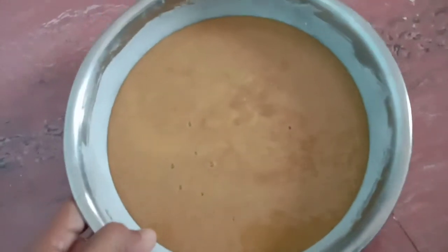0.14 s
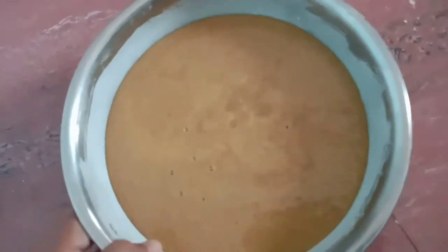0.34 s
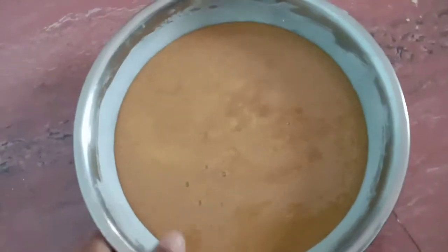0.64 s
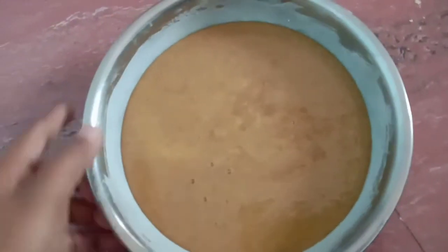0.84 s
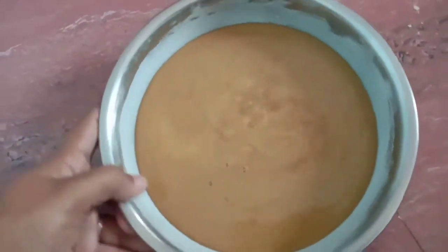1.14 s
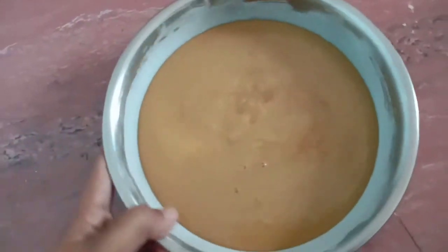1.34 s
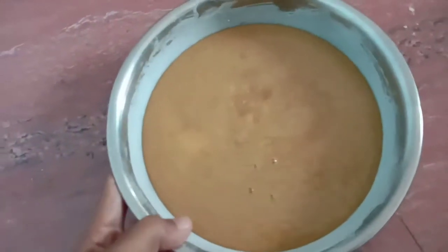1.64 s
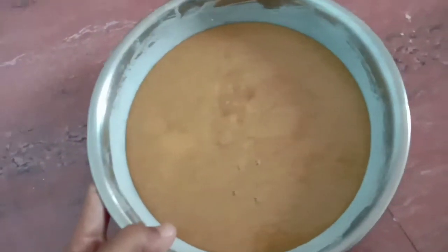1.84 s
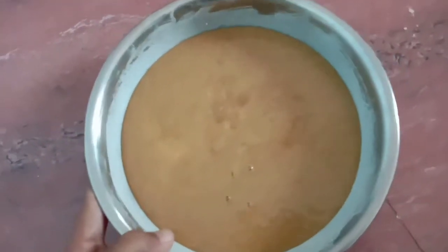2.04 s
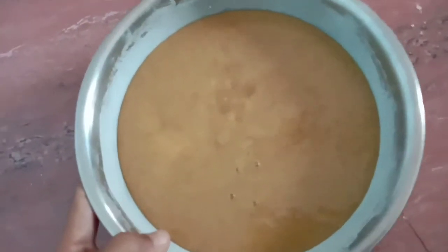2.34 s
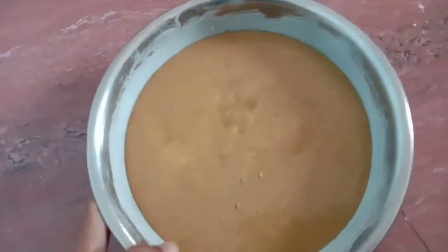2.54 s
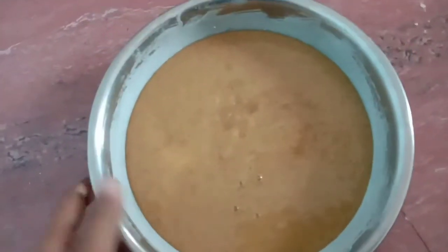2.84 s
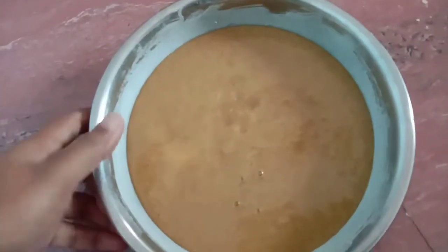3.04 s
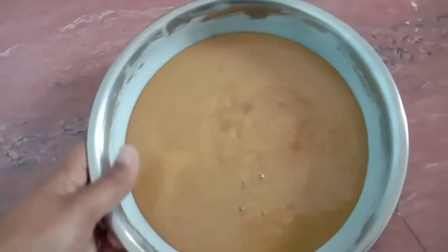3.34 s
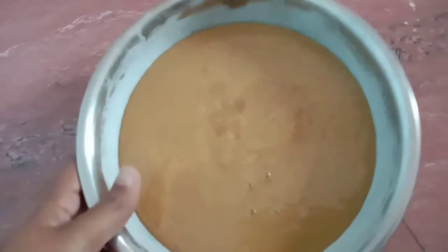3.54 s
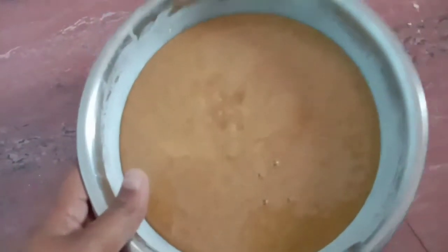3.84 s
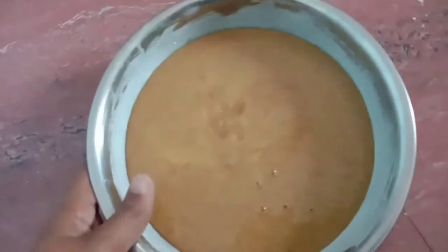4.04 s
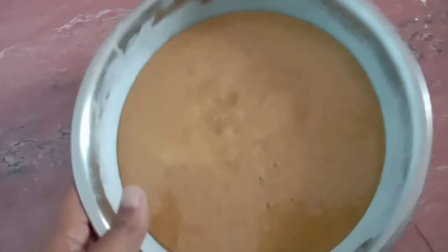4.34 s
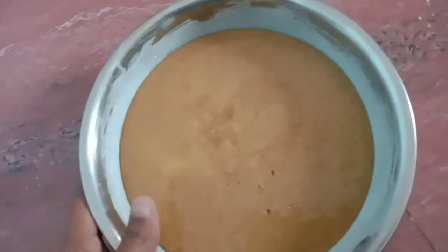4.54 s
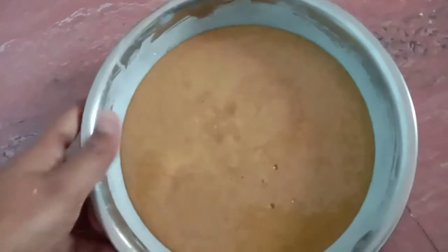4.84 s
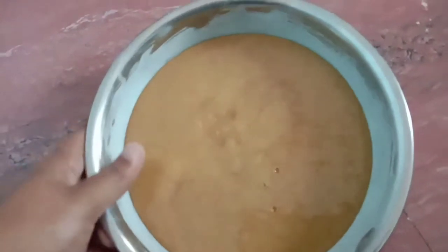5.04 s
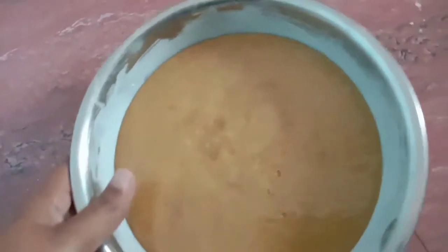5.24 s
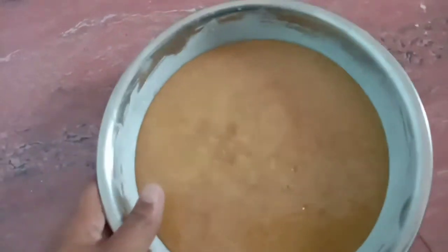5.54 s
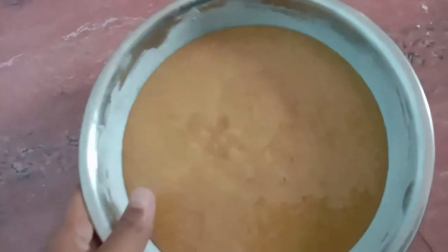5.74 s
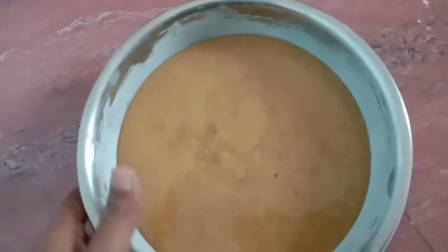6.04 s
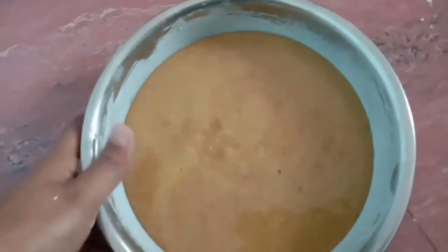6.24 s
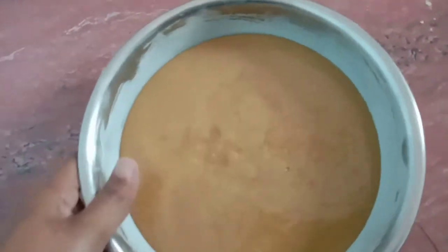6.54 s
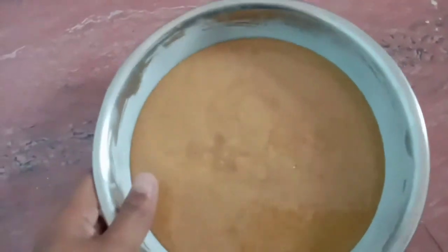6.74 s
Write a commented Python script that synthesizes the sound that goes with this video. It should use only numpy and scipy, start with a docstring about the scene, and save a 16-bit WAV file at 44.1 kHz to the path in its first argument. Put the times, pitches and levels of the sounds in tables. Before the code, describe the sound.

A steel tin heavy with batter is knocked on a hard floor, very close to a phone microphone in a bare, reflective room. The tail of an earlier knock opens the scene; a strong thump with an instant rebound lands at 0.3 s, with a weak clink at 0.4. Fingers tick lightly on the rim and the tin shifts faintly around 1.0-1.3. Firm knocks follow at 1.9 and 2.5, then small ticks at 2.7. Another pair comes at 3.9 and 4.4, the second clattering into a rebound, and another at 5.4 and 5.8, with quick double contacts. A softer knock at 6.6 ends it, its echo cut off. Each blow is abrupt, dull and hollow, with a few milliseconds of steel, a faint rim ring and a roomy tail fading within half a second. Underneath lie faint hum, a wavering thin whine and low rumble with brief swells.

```python
"""A steel tin full of batter is knocked on a hard floor in loose pairs, close under a phone microphone.
Each contact sums a short thump, short low tones, steel sines, filtered-noise grit and a faint rim ring;
delayed copies are floor, wall and ceiling echoes, and convolution with random taps is the bare room.
Fingers tick on the rim (sine clusters and noise) and now and then shift the tin (resonated grit).
Beneath lie a faint household hum, a thin whine and a low rumble, all shaped noise."""
import sys
import numpy as np
from scipy import signal
from scipy.fft import rfft, irfft
from scipy.io import wavfile
from scipy.ndimage import uniform_filter1d, minimum_filter1d

SR = 44100
rng = np.random.default_rng(int(sys.argv[2]) if len(sys.argv) > 2 else 0)


def field_ratio(decibels):
    """Amplitude ratio for a level in dB (20 dB per decade); scalars and array-likes work."""
    return 10 ** (np.asarray(decibels, dtype=float) / 20)


def generate_wav(sig):
    """Save sig (samples, or channels by samples) to the path in sys.argv[1] as 16-bit PCM at SR."""
    pcm = np.round(np.clip(np.atleast_2d(sig).T, -1, 1) * 32767).astype(np.int16)
    wavfile.write(sys.argv[1], SR, pcm)


N = 303652

# Contacts of tin and floor, rebounds too; steel, crack and room are relative to the blow:
# (time [s], blow [dB], steel ring [dB], crack [dB], room [dB])
KNOCKS = [(-0.0949, -8, -9, -34, -11), (0.3333, 2.5, -5.5, -19.5, -11), (0.3395, 0.5, -13, -15, -10.5),
          (.4108, -18.5, -1.5, -0.5, -13.5), (0.4254, -13, -9.5, -25, -5.5), (1.9397, 0, -7, -24, -8.5),
          (2.5065, 1.5, -7.5, -15.5, -8), (2.529, -11.5, -4.5, -18, -11), (3.8551, 2.5, -2, -22, -6.5),
          (4.387, 0, 1.5, -17.5, -6), (4.3959, -6.5, -16, -5.5, -9.5), (4.475, 0, -8, -20, -8),
          (5.433, 3.5, -13.5, -21, -12.5), (5.4394, -2.5, -5.5, -15.5, -7), (5.84, 2.5, -6, -21.5, -6.5),
          (5.843, -1, 3, -14, -7), (5.8962, -8.5, -16, -21, -1.5), (6.6445, -5.5, -10, -35, -7.5),
          (6.6533, -20, -1.5, -18.5, 0.5)]
# Short low tones of the knock, coloured by the near echo: (frequency [Hz], level [dB], t60 [s])
LOW_TONES = [(150.8, -43, 0.089), (325.5, -26, 0.03), (507, -8.5, 0.026), (773, -21.5, 0.025),
             (1216, -9.5, 0.015), (1682, -19, 0.046)]
# Steel wall of the tin: (frequency [Hz], level [dB], t60 [s])
STEEL_MODES = [(2646, -46, 0.038), (3430, 3.5, 0.0044), (3620, -23, 0.023)]
# Bare rim above the batter: (frequency [Hz], level [dB], t60 [s])
RIM_MODES = [(1694, -48.5, 0.22), (2260, -40.5, 0.374), (2580, -41.5, 0.34), (2730, -48, 0.13),
             (3304, -48, 0.202), (3420, -46.5, 0.24), (3800, -43, .25), (6100, -48.5, 0.13),
             (7300, -45, 0.19)]
# First reflections: (delay [ms], thump and low tones [dB], steel and grit [dB])
ECHOES = [(2.53, -8, -7), (15.84, -14, -33.5), (24.86, -20.5, -18)]
# Room decay before steepening: (frequency [Hz], t60 [s])
ROOM_T60 = [(100, 0.94), (260, 0.84), (450, 0.78), (950, 0.73), (1280, 0.77), (1840, 0.63), (4850, 0.56),
            (12800, 0.28)]
# Room tail colour: (frequency [Hz], gain [dB])
ROOM_COLOUR = [(60, -0.5), (150, 7.5), (300, -0.5), (450, 1), (620, -3), (1020, -3.5), (1270, 2.5),
               (1520, 3.5), (1800, 4), (2500, 11), (3500, -5), (4700, 5.5), (6000, 19.5), (7300, 13.5),
               (10000, 7.5), (15500, 6.5)]
# Tones that linger in the tail, before steepening: (frequency [Hz], level [dB], t60 [s])
TAIL_TONES = [(158.9, -34.5, 0.94), (224.8, -34.5, 0.66), (293, -35.5, 1), (356, -32.5, 0.55),
              (412, -36, 0.74), (480.6, -41, 0.84), (593, -39.5, 0.81), (767, -46, 0.37), (800, -37, 0.35),
              (716, -36, .45), (887, -43, .43), (1050, -42.5, 0.38), (1242, -37.5, 0.707),
              (1308, -46, 0.77)]
# Hum spectrum, relative: (frequency [Hz], density [dB per Hz])
HUM_SPECTRUM = [(32, -32), (55, 1), (145, -1), (1010, -17), (1250, -15), (1400, -19.5), (1780, -20),
                (2310, -17.5), (2790, -15.5), (4160, -25), (6530, -29.5), (7170, -23.5), (8870, -38),
                (13300, -42.5), (15300, -34.5), (15900, -70)]
# Fuzzy tones in the hum: (frequency [Hz], width [Hz], level [dB], wavering [dB])
HUM_TONES = [(1245, 72, -71.5, 3), (3060, 50, -89, 2.5), (3587, 230, -81.5, -3), (5880, 210, -79.5, -1),
             (7370, 170, -81, 0), (15200, 300, -93, -2.5)]
# Thin whine: (time [s], level [dB])
WHINE_LEVEL = [(0, -66), (.7, -71.5), (1.3, -84), (2.35, -70.5), (3.6, -68.5), (4.4, -76), (5.3, -72.5),
               (6.6, -65.5), (6.9, -81)]
# Brief swells of the rumble: (time [s], rise [dB], width [s])
RUMBLE_SWELLS = [(.75, 13.5, 0.068), (3.75, 15, 0.026), (6.3, 17, 0.13), (6.548, 0, 0.033)]
# Fingers on the rim: (time [s], level [dB], frequency [Hz])
TICKS = [(0.5732, -51, 7500), (0.6225, -43.5, 8520), (0.9233, -60, 8600), (0.945, -63, 8300),
         (0.9846, -55, 8660), (1.059, -47.5, 8100), (1.2166, -52.5, 7950), (1.266, -38.5, 9370),
         (1.493, -55, 8040), (1.545, -65.5, 7300), (2.702, -42, 8800), (2.7295, -41.5, 7240),
         (2.753, -59, 6900), (2.804, -66, 7200), (3.3518, -60, 8280), (4.582, -39.5, 8630),
         (4.887, -45, 8240), (6.3458, -61.5, 7210)]
# The hand shifts the tin; treble and low tones are relative to the middle band:
# (time [s], middle level [dB], hold [s], treble [dB], low tones [dB])
SHIFTS = [(1.068, -52.5, 0.021, -0.5, 2.5), (1.246, -53.5, .065, -10, -8.5), (2.714, -48, 0.0094, -26, -32),
          (4.866, -67, 0.0089, -5, -15.5)]
# Rubbed tin's tones, relative within each band: (frequency [Hz], width [Hz], level [dB])
RUB_TONES = [(756, 230, 5), (1750, 110, -4), (2850, 24, 4), (3580, 200, 9), (5920, 130, 32), (6880, 41, 15),
             (7500, 38, 37), (7800, 80, -46), (10500, 80, -28)]
# Microphone response: (frequency [Hz], gain [dB])
MIC_RESPONSE = [(25, -38), (60, -13), (110, 2.5), (200, 0), (3900, -3), (4600, -8), (5600, 0.5), (8000, 1),
                (10000, -8), (13000, -19), (15300, -1), (15800, -22), (17000, -59.5)]
# Left-right difference hiss, relative: (frequency [Hz], density [dB per Hz])
SIDE_SPECTRUM = [(15, -31), (25, -8.5), (124, 1.5), (1090, -7), (1250, 2.5), (1640, -11), (5880, -7),
                 (7300, -28), (9330, -18.5), (14800, -10.5), (15400, -11.5), (15900, -51)]

LANDING_MS, REBOUND_MS = 0.27, 0.33  # thump half-width: the edge lands hard, rebounds are softer
REBOUND_WITHIN_S = 0.2
THUMP_PEAK_S, RING_START_S = 0.0015, 0.0011  # from the start of a knock's sound
ROOM_START_MS, ROOM_BUILD_MS, ROOM_STEEPEN_DB_PER_S2 = 7.9, 5.1, 108
ROOM_PATCHY_DB = 2.5  # some tones linger where others drop out
HUM_DB, SIDE_DB = -63, -79
WHINE_HZ, WHINE_WIDTH_HZ, WHINE_WAVER_DB = 2778, 32, 3
RUMBLE_HZ, RUMBLE_WIDTH_HZ, RUMBLE_DB, RUMBLE_WAVER_DB = 149, 39, -70, 4.5
TICK_RIM_DB, TICK_SNAP_DB = 20, -8
SHIFT_RISE_S, SHIFT_FALL_DB_PER_S = 0.012, 192
CEILING_DB, AHEAD_MS, RECOVER_DB_PER_S = -3, 8.1, 99


def evened(x):
    """Scales to rms 1."""
    return x / np.sqrt(np.mean(x ** 2) + 1e-20)


def read(points, hz):
    """Interpolates points linearly on a log-frequency axis."""
    f, value = np.transpose(points)
    return np.interp(np.log(hz + 1), np.log(f + 1), value)


def add(mix, time_s, sound):
    """Mixes a sound in at a time that may lie before the start."""
    at = round(time_s * SR)
    sound = sound[max(-at, 0):]
    part = mix[max(at, 0):][:len(sound)]
    part += sound[:len(part)]


def resonate(x, hz, width_hz):
    """One-pole resonance of gain 1: shifted to 0 Hz, smoothed, shifted back."""
    turn = np.exp(2j * np.pi * hz * np.arange(len(x)) / SR)
    r = np.exp(-np.pi * width_hz / SR)
    return 2 * (turn * signal.lfilter([1 - r], [1, -r], x / turn)).real


def rings(modes, t, spread_db=0, detune=0):
    """Sum of decaying sines; each call stirs their levels and pitches afresh."""
    out = 0
    for hz, db, t60_s in modes:
        level_luck, pitch_luck = rng.standard_normal(2)
        envelope = field_ratio(db + spread_db * level_luck - 60 * t / t60_s)
        out = out + envelope * np.sin(2 * np.pi * hz * (1 + detune * pitch_luck) * t)
    return out


def slow(rate_per_s, count):
    """Slow random curve of rms 1."""
    points = rng.standard_normal(int(count / SR * 2 * rate_per_s) + 2)
    return evened(signal.resample(points, count))


def room(sound):
    """Room tail: evenly dense random taps swell up, and each band dies at its own speed, ever faster."""
    t = np.arange(SR) / SR
    slots = np.arange(0, SR - 16, 16)
    at = slots + rng.integers(0, 16, len(slots))
    clumps = field_ratio(1.2 * slow(90, SR))  # big surfaces answer in bunches
    taps = np.zeros(SR)
    taps[at] = rng.standard_normal(len(at)) * clumps[at]

    hz, frame_s, z = signal.stft(taps, SR, nperseg=512)
    t60_s = np.clip(read(ROOM_T60, hz), 0.1, 2)[:, None]
    fade_db = read(ROOM_COLOUR, hz)[:, None] - 60 * frame_s / t60_s
    patches = uniform_filter1d(rng.standard_normal(z.shape), size=2, axis=0)
    patches = evened(uniform_filter1d(patches, size=24, axis=1))
    tail = signal.istft(z * field_ratio(fade_db + ROOM_PATCHY_DB * patches), SR, nperseg=512)[1][:SR]

    for _ in range(2):  # close pairs beat
        tail += rings(TAIL_TONES, t, spread_db=4, detune=0.015)
    late_ms = np.maximum(t * 1000 - ROOM_START_MS, 0)
    build = 1 - np.exp(-late_ms / ROOM_BUILD_MS)
    steepen = field_ratio(-ROOM_STEEPEN_DB_PER_S2 * (late_ms / 1000) ** 2)
    return signal.fftconvolve(sound, tail * build * steepen / np.sqrt(150))


def knock(blow_db, steel_db, crack_db, room_db, half_width_ms):
    """The tin stops dead: a suck-push-suck of air, short low tones, steel ring and gritty crack."""
    t = np.arange(16000) / SR
    u = (t - THUMP_PEAK_S) * 1000 / half_width_ms
    thump = (1 - u ** 2) * np.exp(-u ** 2 / 2)
    after = np.maximum(t - RING_START_S, 0)
    swell = 1 - np.exp(-(after / 0.00021) ** 2)  # the floor's push builds up over the contact
    grit = resonate(rng.standard_normal(len(t)), 7500, 5050) * np.exp(-after / 0.0022)

    low = thump + swell * rings(LOW_TONES, after, spread_db=2)
    steel = swell * field_ratio(steel_db) * rings(STEEL_MODES, after, spread_db=1)
    high = steel + swell * field_ratio(crack_db) * grit
    # the room is fed one even click in place of the grit
    click = field_ratio(crack_db + 16) * signal.unit_impulse(len(t), idx=66)

    out = field_ratio(room_db) * room(low + field_ratio(3.5) * steel + click)
    add(out, 0, swell * rings(RIM_MODES, after, spread_db=4, detune=0.01))
    direct = (0, 0.0004, 0.0036)
    for delay_ms, low_db, high_db in [direct] + list(ECHOES):
        add(out, delay_ms / 1000, field_ratio(low_db) * low + field_ratio(high_db) * high)
    return field_ratio(blow_db) * out


def hum():
    """Patchy broadband noise, as it leaves the microphone, with fuzzy tones that come and go."""
    frames, hz = N // 256 + 5, np.fft.rfftfreq(1024, 1 / SR)
    real, imag, patches = rng.standard_normal((frames, 513, 3)).T
    patches = uniform_filter1d(patches, 10, axis=0)
    patches = evened(uniform_filter1d(patches, 12, axis=1))
    z = (real + 1j * imag) * field_ratio(read(HUM_SPECTRUM, hz)[:, None] + 0.5 * patches)
    noise = signal.istft(z, nperseg=1024, noverlap=768)[1][:N]
    out = field_ratio(HUM_DB) * evened(noise)
    for tone_hz, width_hz, db, waver_db in HUM_TONES:
        tone = evened(resonate(rng.standard_normal(N), tone_hz, width_hz))
        out += field_ratio(db + waver_db * slow(1.5, N)) * tone
    return out


def wander(level_db, hz, width_hz, waver_db):
    """Fuzzy tone: noise through two resonances, its level wavering."""
    level_db = level_db + waver_db * slow(10, N)
    tone = resonate(rng.standard_normal(N), hz, width_hz)
    return field_ratio(level_db) * evened(resonate(tone, hz, 2 * width_hz))


def whine():
    """Thin whine: narrowband noise on a drawn level curve."""
    level_db = np.interp(np.arange(N) / SR, *np.transpose(WHINE_LEVEL))
    return wander(level_db, WHINE_HZ, WHINE_WIDTH_HZ, WHINE_WAVER_DB)


def rumble():
    """Low rumble: narrowband noise with brief bell-shaped swells."""
    t = np.arange(N) / SR
    level_db = RUMBLE_DB + sum(rise_db * np.exp(-((t - s) / width_s) ** 2)
                               for s, rise_db, width_s in RUMBLE_SWELLS)
    return wander(level_db, RUMBLE_HZ, RUMBLE_WIDTH_HZ, RUMBLE_WAVER_DB)


def tick(level_db, hz):
    """Fingernail on the rim: broad snap, a few ms of rough high ring, faint rim modes and room."""
    t = np.arange(1500) / SR
    ratios = (1, *rng.uniform(0.85, 1.12, 2))
    cluster = sum(np.sin(2 * np.pi * hz * ratio * t) for ratio in ratios)
    ring = cluster * (1 - np.exp(-t / 0.0005)) * np.exp(-t / 0.0025)
    snap = 2 * resonate(rng.standard_normal(len(t)), hz, 3100) * np.exp(-t / 0.0037)
    touch = ring / abs(ring).max() + field_ratio(TICK_SNAP_DB) * snap
    out = field_ratio(-15.5) * room(touch)
    add(out, 0, touch)
    rim = rings(RIM_MODES, np.arange(16000) / SR, spread_db=4, detune=0.04)
    add(out, 0, field_ratio(TICK_RIM_DB) * rim)
    return field_ratio(level_db) * out


def shift(level_db, hold_s, treble_db, low_db):
    """Dense grit under the sliding tin excites its tones; it starts fast, holds and dies away."""
    t = np.arange(12000) / SR
    grit = rng.standard_normal(len(t)) * field_ratio(2 * slow(150, len(t)))
    tones = [(hz, field_ratio(db) * resonate(grit, hz, width_hz) / np.sqrt(width_hz))
             for hz, width_hz, db in RUB_TONES]

    def band(from_hz, to_hz):
        """Sums the tones of one band to rms 1."""
        return evened(sum(tone for hz, tone in tones if from_hz <= hz < to_hz))

    low = band(0, 2000)
    mid = evened(band(2000, 5000) + 0.7 * evened(resonate(grit, 3200, 1500)))
    high = evened(band(5000, SR) + 0.8 * evened(resonate(grit, 7500, 4000)))
    mix = field_ratio(low_db) * low + mid + field_ratio(treble_db) * high
    rise = np.minimum(t / SHIFT_RISE_S, 1) ** 2
    fall_db = SHIFT_FALL_DB_PER_S * np.maximum(t - SHIFT_RISE_S - hold_s, 0)
    return rise * field_ratio(level_db - fall_db) * mix


def microphone(x):
    """Small microphone behind its port: thin bass, a dip, a late peak; minimum phase from the log gain."""
    hz = abs(np.fft.fftfreq(8192, 1 / SR))
    log_gain = np.log(field_ratio(read(MIC_RESPONSE, hz)))
    phase = -signal.hilbert(log_gain).imag
    taps = np.fft.ifft(np.exp(log_gain + 1j * phase)).real[:4096]
    return signal.oaconvolve(x, taps)[:N]


def scene():
    """All sounds reach one spot; the hum joins after the microphone."""
    close = whine() + rumble()
    gaps_s = np.diff([row[0] for row in KNOCKS], prepend=-np.inf)
    for (s, *levels_db), gap_s in zip(KNOCKS, gaps_s):
        half_width_ms = REBOUND_MS if gap_s < REBOUND_WITHIN_S else LANDING_MS
        add(close, s - THUMP_PEAK_S, knock(*levels_db, half_width_ms))
    for s, *settings in TICKS:
        add(close, s, tick(*settings))
    for s, *settings in SHIFTS:
        add(close, s, shift(*settings))
    mix = microphone(close) + hum()
    return np.array([mix, mix])


def limiter(x):
    """Looks a little ahead, ducks before each peak over the ceiling and recovers steadily."""
    ahead = int(AHEAD_MS * SR / 1000)
    over_db = np.maximum(20 * np.log10(abs(x) + 1e-9) - CEILING_DB, 0)
    coming_db = -minimum_filter1d(-over_db, ahead, origin=-(ahead // 2))
    fall_db = np.arange(N) * RECOVER_DB_PER_S / SR
    held_db = np.maximum.accumulate(coming_db + fall_db) - fall_db
    return x / field_ratio(uniform_filter1d(held_db, size=200))


def side_hiss():
    """Faint shaped noise, opposite in left and right."""
    hz = np.fft.rfftfreq(N, 1 / SR)
    spectrum = rfft(rng.standard_normal(N)) * field_ratio(read(SIDE_SPECTRUM, hz))
    return field_ratio(SIDE_DB) * evened(irfft(spectrum, N))


def roll_off(x):
    """The treble ends steeply here."""
    return signal.sosfilt(signal.butter(12, 16810, fs=SR, output="sos"), x)


def record(dry):
    """Limits the mono mix, then adds the hiss that sets left and right apart."""
    mid = limiter(dry[0])
    side = side_hiss()
    return roll_off(np.array([mid + side, mid - side]))


dry = scene()
out = record(dry)
generate_wav(out)
```